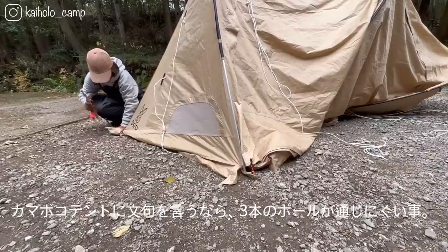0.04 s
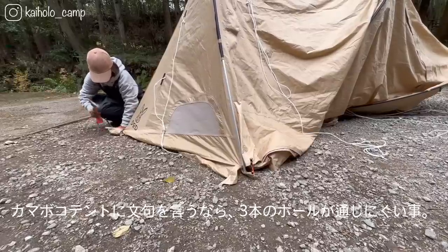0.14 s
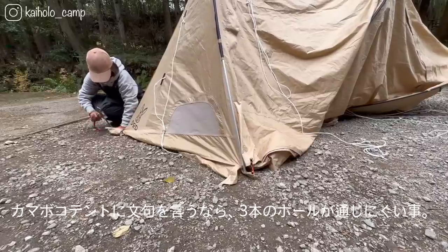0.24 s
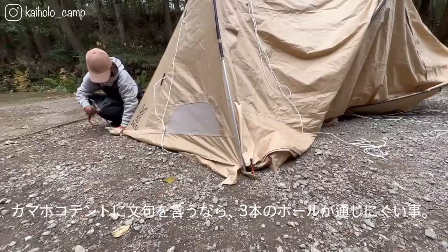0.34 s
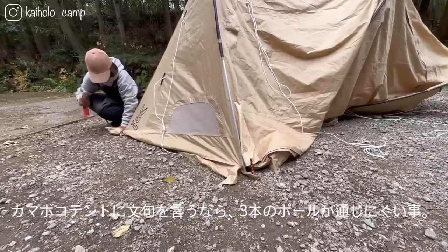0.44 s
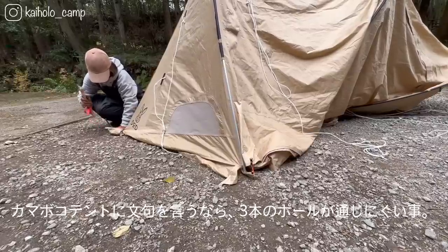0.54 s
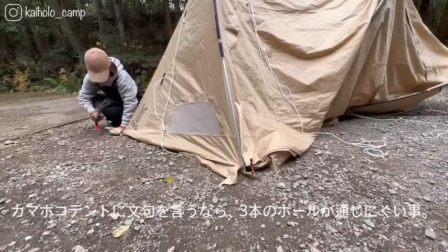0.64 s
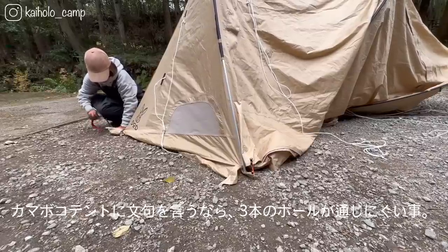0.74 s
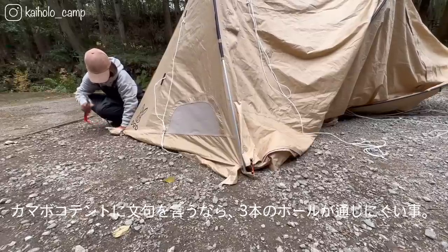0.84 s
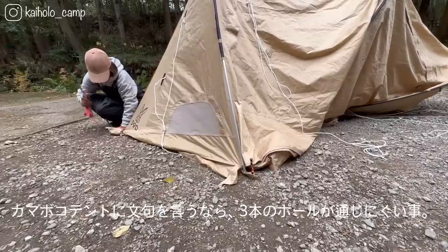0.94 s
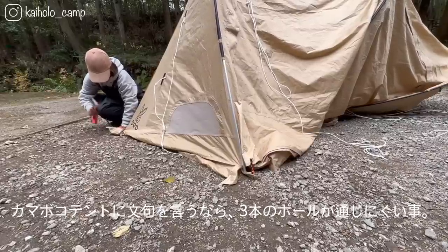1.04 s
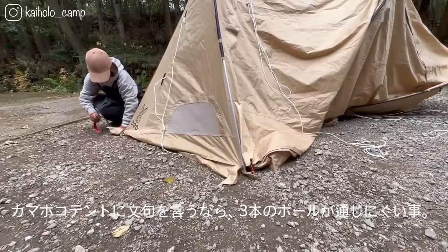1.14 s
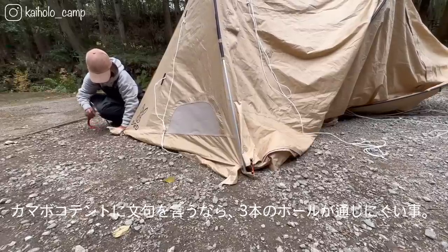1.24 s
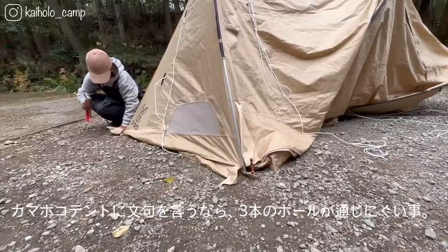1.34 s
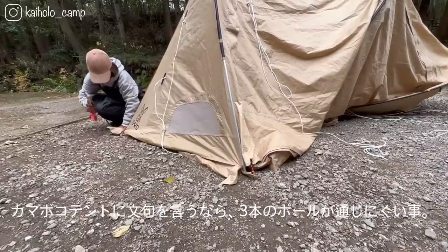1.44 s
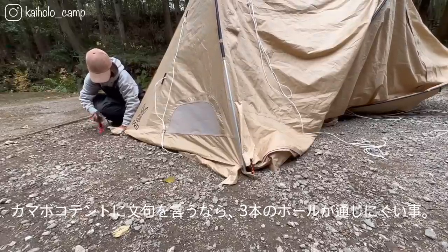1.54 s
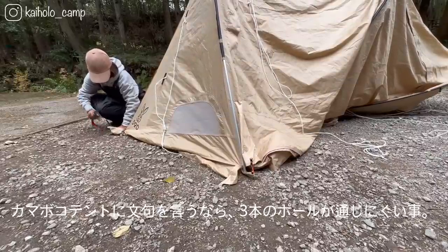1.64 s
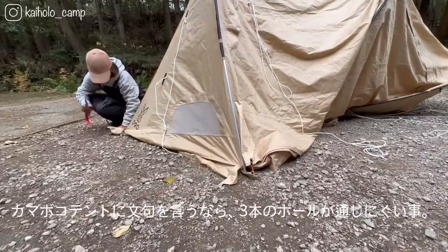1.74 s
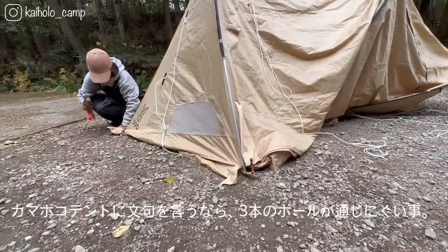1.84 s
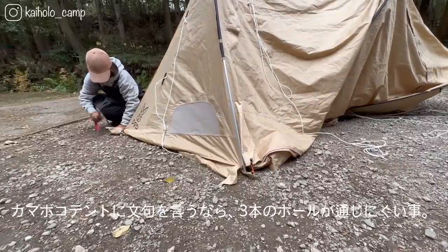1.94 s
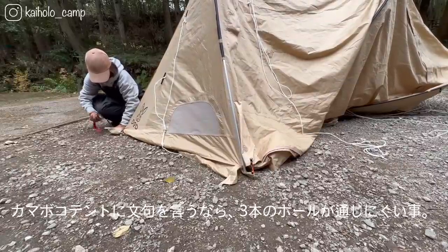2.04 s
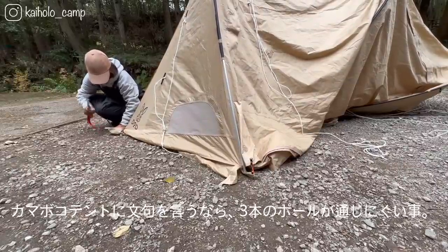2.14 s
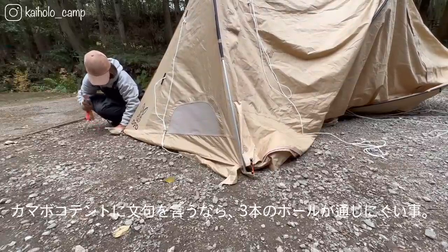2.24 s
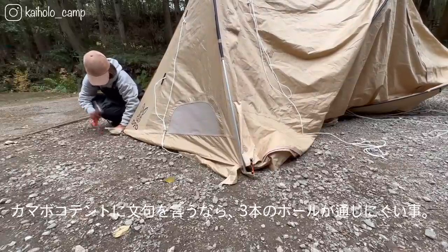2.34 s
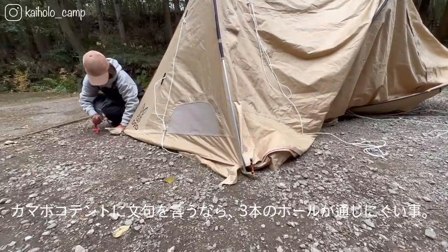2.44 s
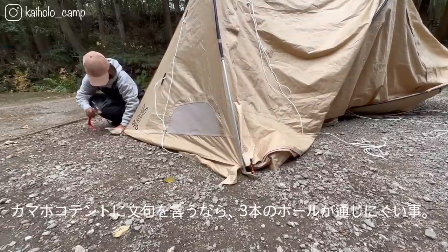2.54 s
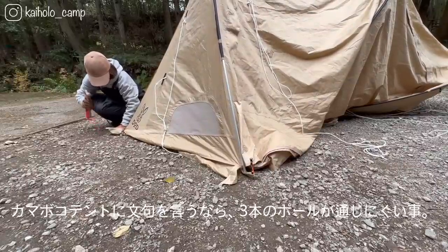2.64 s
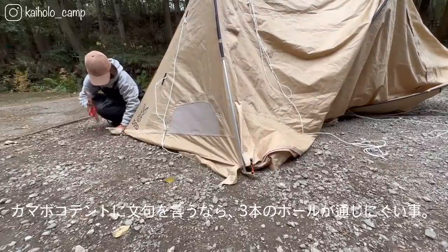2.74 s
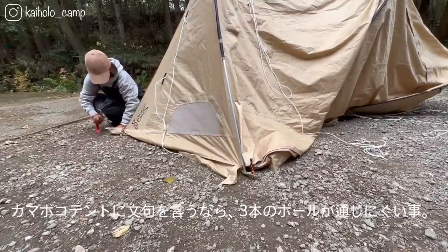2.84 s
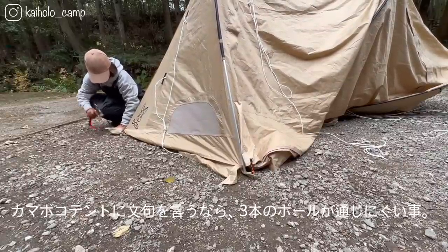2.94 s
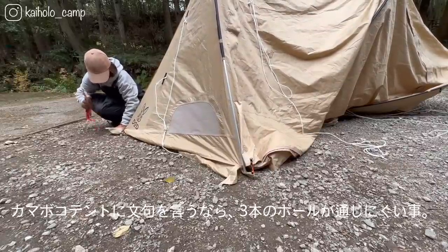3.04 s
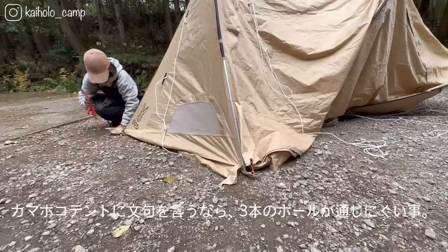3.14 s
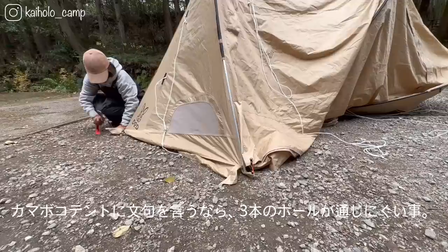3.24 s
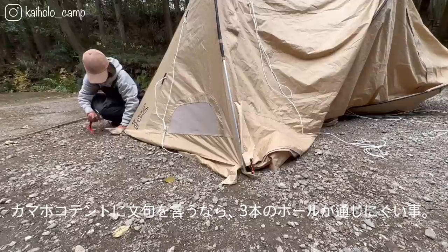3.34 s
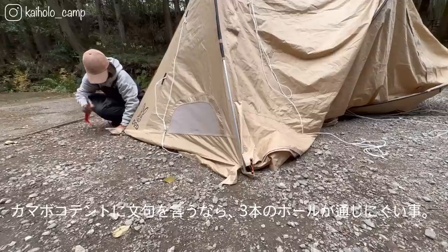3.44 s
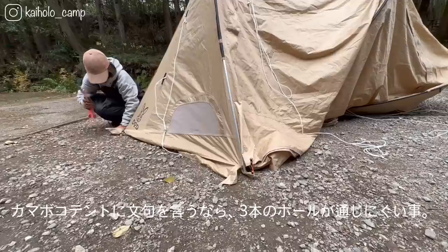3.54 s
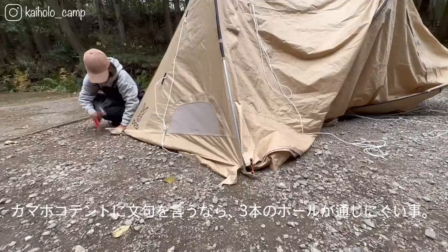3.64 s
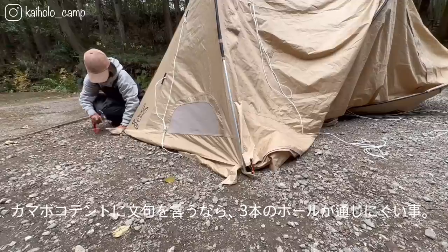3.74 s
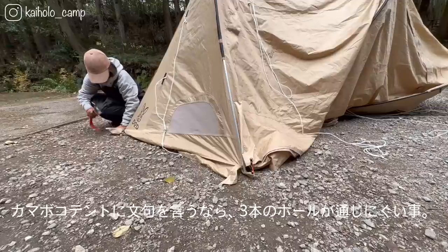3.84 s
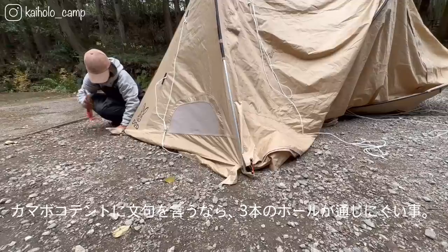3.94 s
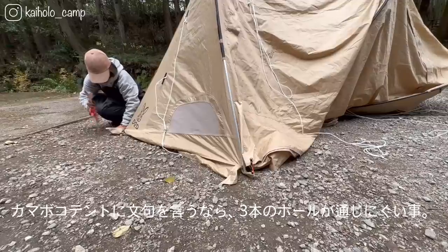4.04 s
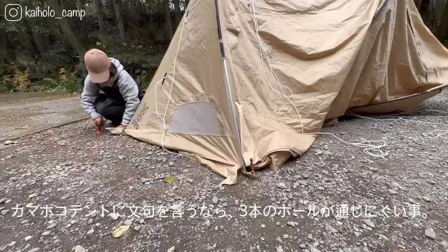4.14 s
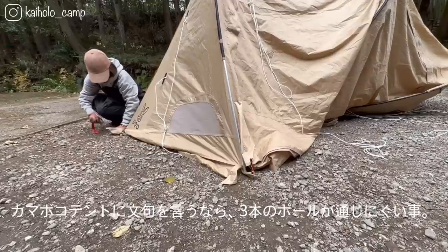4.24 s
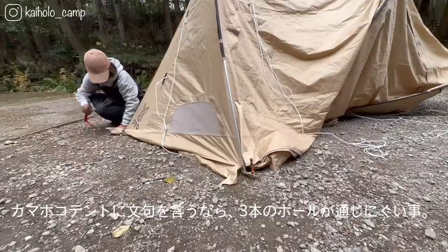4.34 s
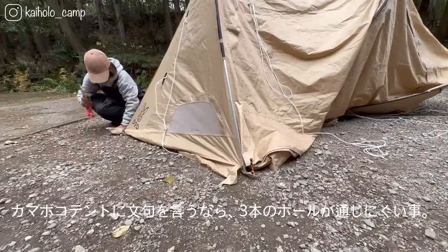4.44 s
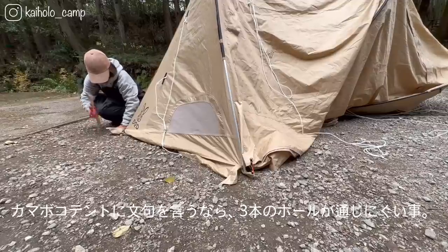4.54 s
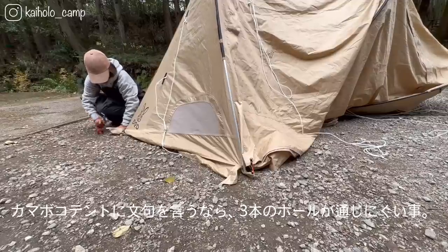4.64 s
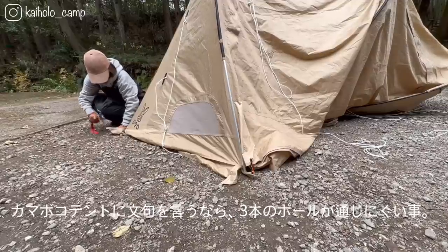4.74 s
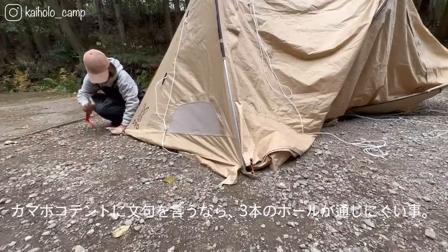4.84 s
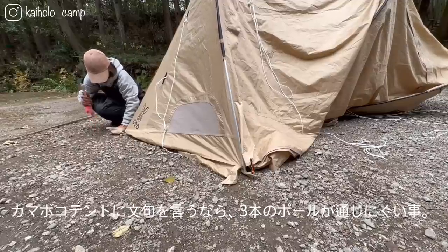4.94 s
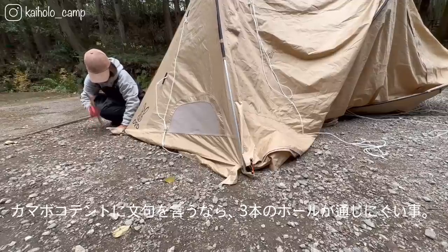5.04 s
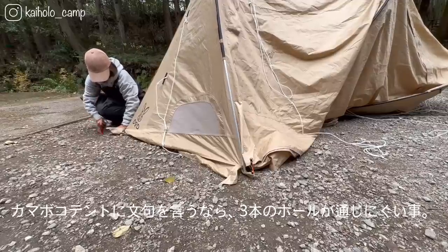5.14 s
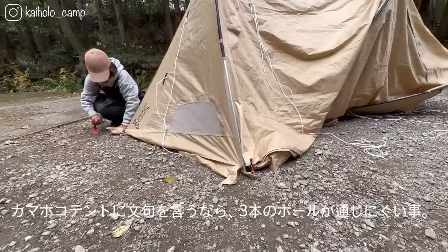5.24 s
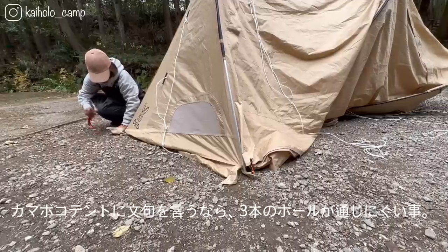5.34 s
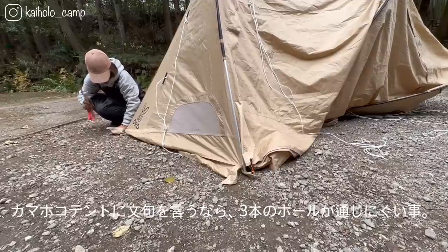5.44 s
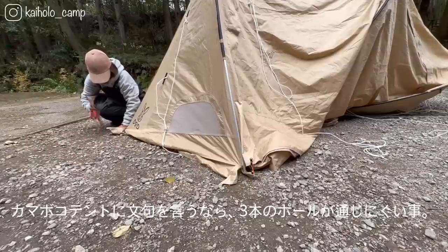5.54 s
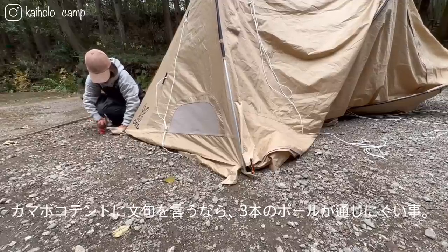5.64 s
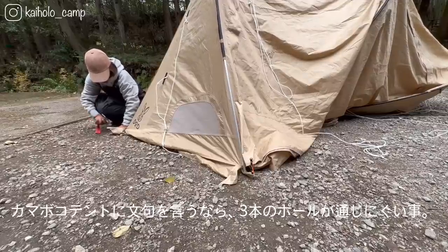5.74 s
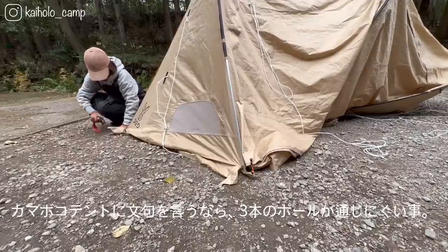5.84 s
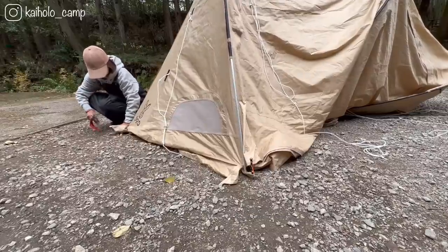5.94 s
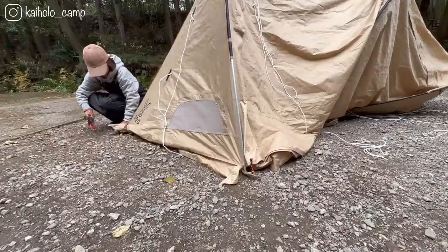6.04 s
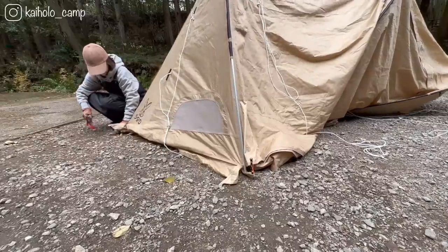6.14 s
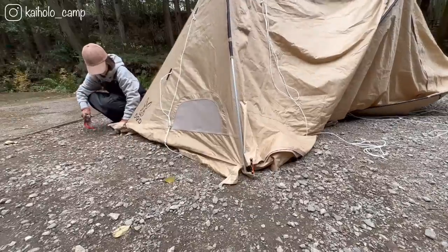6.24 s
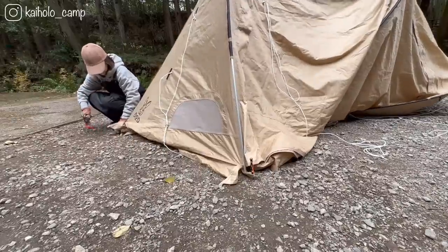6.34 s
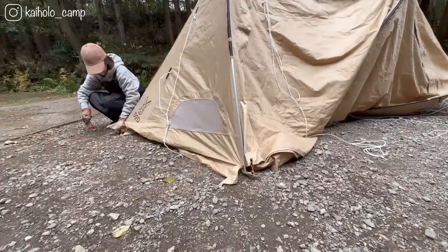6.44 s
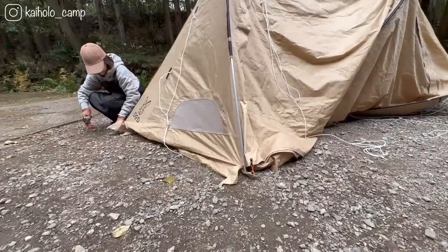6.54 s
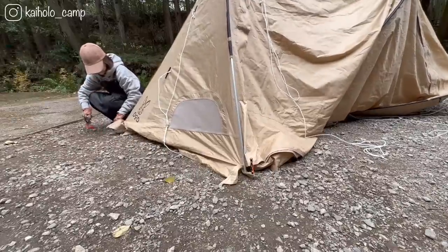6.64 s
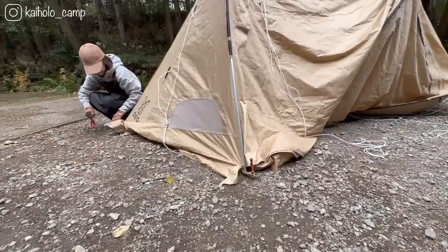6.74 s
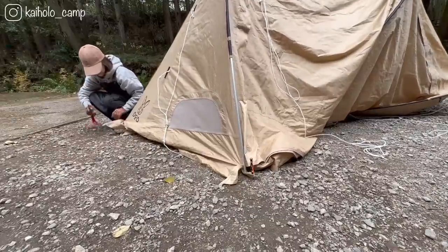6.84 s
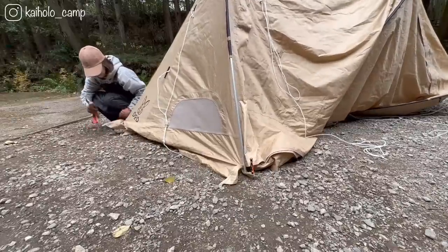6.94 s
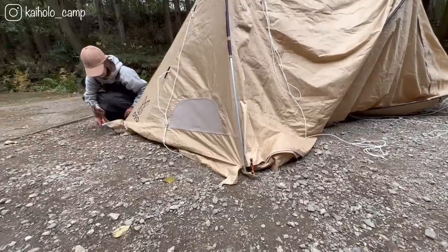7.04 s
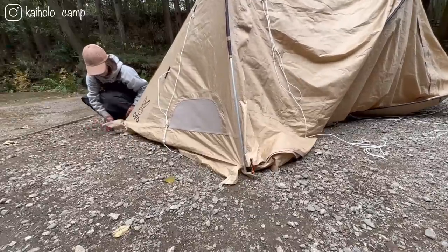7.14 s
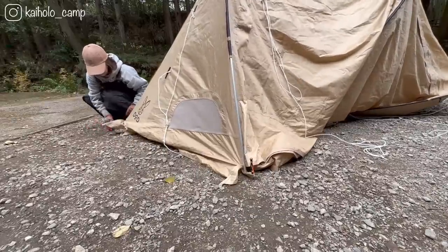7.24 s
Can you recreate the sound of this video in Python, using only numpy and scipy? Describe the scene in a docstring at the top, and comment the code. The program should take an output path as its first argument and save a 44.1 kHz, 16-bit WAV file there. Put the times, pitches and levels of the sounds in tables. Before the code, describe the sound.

Sharp hammer blows on a tent peg, a few metres left of a stereo microphone outdoors. Each is a bright crack with a short steel ring, a low thump and a brief diffuse echo from tent and trees. Light scrapes and bounce ticks fill the gaps as the ground firms. The steady series stops, tent fabric rustles, dull ground knocks follow, and one last lighter strike lands over low rumble and soft hiss.

```python
"""A steel hammer drives a tent peg into gravel at a forest campsite, a few metres to the left of two microphones.
Low outdoor rumble and soft hiss, made of shaped noise, run throughout. Each blow is a noise crack, damped modes of
steel and a falling thump, answered by diffuse echoes of tent and trees; light scrapes come between blows.
As the soil firms, the thump gives way to a hard clack; from the fifth blow the hammer often drops back on the peg.
Late on, cloth rustles and dull knocks surround a last blow. The loudest peaks overload the recorder."""
import sys
import numpy as np
from scipy import signal
from scipy.fft import rfft, irfft
from scipy.io import wavfile
from scipy.ndimage import uniform_filter1d

SR = 44100
rng = np.random.default_rng(int(sys.argv[2]) if len(sys.argv) > 2 else 0)


def int16_out(signal):
    """Quantize to a 16-bit WAV file."""
    q = np.round(np.clip(np.atleast_2d(signal).T, -1, 1) * 32767)
    wavfile.write(sys.argv[1], SR, q.astype(np.int16))


N = 320607  # length in samples
T = np.arange(SR // 2) / SR  # time after a hit, in seconds


def amp(db):
    """Level law: converts decibels to an amplitude gain."""
    return 10 ** (np.asarray(db) / 20)


def evened(x):
    """Normalisation: scales a signal to rms 1."""
    return x / np.sqrt(np.mean(x ** 2) + 1e-20)


def read(points, hz):
    """Logarithmic pitch scale: reads a table by interpolating along log frequency."""
    f, value = np.transpose(points)
    return np.interp(np.log(hz + 1), np.log(f), value)


def add(mix, s, sound):
    """Superposition: adds a sound into the mix at time s."""
    part = mix[round(s * SR):][:len(sound)]
    part += sound[:len(part)]


def colour(points, size=2048):
    """Minimum phase: the log spectrum alone fixes a causal impulse response."""
    log_gain = np.log(amp(read(points, abs(np.fft.fftfreq(size, 1 / SR)))))
    return np.fft.ifft(np.exp(np.conj(signal.hilbert(log_gain)))).real[:size // 2]


# How firmly the soil resists the sinking peg.
# Each row: time in seconds, firmness from 0 (loose) to 1 (firm).
SOIL_FIRMNESS = [(0.17, 0.01), (1.94, 0.29), (2.81, .9), (5.6, 1)]


def by_soil(s, loose, firm):
    """Soil resistance: blends a value for loose soil into one for firm soil as the peg sinks."""
    return loose + (firm - loose) * np.interp(s, *np.transpose(SOIL_FIRMNESS))


# Relative spectrum of the outdoor air. Each row: frequency in Hz, density in dB per Hz.
AIR_SPECTRUM = [(15, -49), (25, -19.5), (47, -15), (70, -1), (149, -16.5), (185, -17.5), (270, -17),
                (363, -12), (516, -18.5), (2000, -23.5), (2910, -25.5), (4370, -28), (7510, -39.5),
                (14000, -48.5), (16000, -63.5)]
# Likeness of the two channels. Each row: frequency in Hz, left-right coherence (signed, -1 to 1).
AIR_COHERENCE = [(60, 0.94), (130, 0.9), (290, 0.48), (640, -0.38), (1410, -0.27), (3100, 0), (6820, 0.11),
                 (15000, 1)]
# Balance of the two channels. Each row: frequency in Hz, left minus right in dB.
AIR_BALANCE_DB = [(60, 0.5), (700, 2.5), (2400, 2), (4400, 4.5), (8100, -1), (15000, 0)]
# Troughs of the low rumble. Each row: time in seconds, level in dB.
RUMBLE_TROUGHS = [(0.0, -52), (1.96, -46.5), (2.61, -49), (3.87, -44), (5.95, -48), (6.88, -52.5),
                  (7.27, -50)]
RUMBLE_OVER_DB, HISS_DB = 2, -47  # mean rumble above its troughs; steady forest hiss


def air():
    """Partially coherent noise: low outdoor rumble and soft forest hiss, drifting in patches."""
    frames, hz = N // 512 + 5, np.fft.rfftfreq(2048, 1 / SR)
    a, b, c, d, patches = rng.standard_normal((5, len(hz), frames))
    patches = uniform_filter1d(patches, size=10, axis=0)
    patches = evened(uniform_filter1d(patches, size=8, axis=1))
    left = a + 1j * b
    independent = c + 1j * d
    coherence = np.clip(read(AIR_COHERENCE, hz), -1, 1)[:, None]
    right = coherence * left + np.sqrt(1 - coherence ** 2) * independent
    right = right / amp(read(AIR_BALANCE_DB, hz))[:, None]
    level_db = read(AIR_SPECTRUM, hz)[:, None] + 1.5 * patches
    spectrum = np.array([left, right]) * amp(level_db)
    low = 1 / (1 + (hz[:, None] / 160) ** 4)  # rumble lies mostly below 160 Hz, hiss above
    rumble_db = np.interp(np.arange(N) / SR, *np.transpose(RUMBLE_TROUGHS)) + RUMBLE_OVER_DB
    out = np.zeros((2, N))
    for share, db in zip((low, 1 - low), (rumble_db, HISS_DB)):
        noise = signal.istft(spectrum * share, nperseg=2048, noverlap=1536)[1][:, :N]
        out += evened(noise) * amp(db)
    return out


# Relative spectrum of steel cracking on steel and grit. Each row: frequency in Hz, density in dB per Hz.
CRACK_SPECTRUM = [(100, -23.5), (400, -2), (1100, -4.5), (1900, 3), (2450, -8), (3000, -3.5), (3900, -0.5),
                  (4800, -2), (6000, -3.5), (7500, -1), (9000, -9), (11500, -10), (13000, -15.5),
                  (15200, -18), (16500, -10.5)]


def burst(length, steepness, tilt_db=0):
    """Impact excitation: a few milliseconds of steel chattering, uneven in time and broad in pitch."""
    envelope = np.exp(-(T[:4096] / length) ** steepness)  # length in seconds
    spectrum = rfft(rng.standard_normal(len(envelope)) * envelope)
    # partly flatten the random spectrum so the crack sounds broad and even in pitch
    flattened = spectrum / (abs(spectrum) + 1e-9) ** .6
    chatter = irfft(flattened) * envelope ** .3
    chatter *= np.linalg.norm(envelope) / np.linalg.norm(chatter)
    tilted = [(hz, db + tilt_db * np.log2(hz / 4000)) for hz, db in CRACK_SPECTRUM]  # dB per octave
    shape = colour(tilted)
    crack = signal.fftconvolve(chatter, shape / np.linalg.norm(shape))
    return np.pad(crack, (0, len(T) - len(crack)))


def ring(modes, detune, spread_db, rise):
    """Modal superposition: damped sines, whose level, pitch and phase vary a little with each hit."""
    out = np.zeros(len(T))
    for (hz, db, t60), (a, b, c) in zip(modes, rng.standard_normal((len(modes), 3))):
        decay = np.exp(-np.log(1000) * T / t60)
        wave = np.sin(2 * np.pi * (hz * (1 + detune * b) * T + c))
        out += amp(db + spread_db * a) * decay * wave
    return out * (1 - np.exp(-T / rise))


def thump(crest, start_hz, end_hz, glide):
    """Dispersion: low notes of the ground's push arrive later than high ones, so the pitch drops."""
    turns = end_hz * T + (start_hz - end_hz) * glide * (1 - np.exp(-T / glide))
    u = T / crest  # the envelope peaks at the crest time, in seconds
    return u * np.exp((1 - u ** 3) / 3) * np.sin(2 * np.pi * turns)


# Hammer blows; where the face lands decides which notes of the peg ring.
# Each row: start in seconds, force in dB, low ring in dB, middle ring in dB, high ring in dB,
# pitch of the gripped shaft in Hz.
HAMMER_BLOWS = [(0.1705, -3.5, 6.5, -36.5, -42, 3180), (0.6329, -0.5, -4, -15, -30, 3840),
                (1.071, -0.5, -18.5, -34.5, -46.5, 3260), (1.5097, 0.5, 1, -22.5, -47, 3300),
                (1.9391, -0.5, 0.5, -39, -30.5, 3960), (2.3610, -1.4, -13, -31.5, -56.5, 3730),
                (2.809, 0.5, -33, -17, -46, 3450), (3.223, 1.5, -11, -23, -39, 3053),
                (3.658, 0, -9, -27, -46, 3180), (4.1022, -.5, -9, -16.5, -32.5, 3670),
                (4.5876, 0.5, -16, -22, -50.5, 3160), (5.0904, -0.8, -28, -25, -43, 3210),
                (5.5962, -0.1, -24.5, -33, -47, 3040), (7.1109, -4, -22.5, -22, -41, 2690)]
# Free ringing of the peg: the low note and its lingering twin, a middle pair, then the high ones.
# Each row: frequency in Hz, relative level in dB, 60 dB decay time in seconds.
PEG_MODES = [(4086, -1, .115), (4076, -0.5, 0.42), (7562, 0, .15), (7750, -7, 0.11), (9885, -2, .24),
             (9815, -6, 0.24), (9955, -6, .2), (11940, -12.5, 0.12), (12260, -10, .12)]
# Quickly damped modes of the hammer head and the gripped peg.
# Each row: frequency in Hz, relative level in dB, 60 dB decay time in seconds.
CLACK_MODES = [(1860, -10.5, .018), (2958, -0.5, 0.025), (3293, 0.5, 0.016), (3513, -10, 0.018),
               (4400, -11.5, .015), (4835, 3, 0.018), (6950, -11, .018), (7390, -17.5, 0.024),
               (7670, -9.5, 0.025), (9500, -10.5, 0.015), (11060, -2, 0.017), (11580, -3, 0.018)]
CRACK_DB, CRACK_S, CRACK_TILT_DB = -0.5, 0.0051, 0.5  # level at 0 dB force, length, tilt per octave
CLACK_LOOSE_DB, CLACK_FIRM_DB, CLACK_PER_FORCE = -15, -0.5, 2.4  # last: dB per dB of force
THUMP_LOOSE_DB, THUMP_FIRM_DB = -6, -13.5  # firm soil gives less
CREST_LOOSE_S, CREST_FIRM_S = .0078, 0.0031  # time to the thump's crest
# the low note's lingering twin follows its level (last: dB per dB)
LINGER_LOOSE_DB, LINGER_FIRM_DB, LINGER_PER_RING = -30.5, -26.5, .45
RATTLE_DB = 3  # stones shaking against the peg make its ring uneven


def hammering():
    """Impact response: each blow gives a broad crack with the soil's thump and shudder, a clack, and a ring."""
    broad, clack, peg = np.zeros((3, N))
    soil_band = signal.butter(2, [110, 210], "bandpass", fs=SR, output="sos")
    for s, force_db, low_db, middle_db, high_db, shaft_hz in HAMMER_BLOWS:
        crack = burst(CRACK_S, steepness=2.9, tilt_db=CRACK_TILT_DB)
        add(broad, s, amp(CRACK_DB + force_db) * crack)

        thump_db = force_db + by_soil(s, THUMP_LOOSE_DB, THUMP_FIRM_DB)
        crest = by_soil(s, CREST_LOOSE_S, CREST_FIRM_S)
        add(broad, s, amp(thump_db) * thump(crest, start_hz=988, end_hz=176.7, glide=.0028))
        soil_noise = evened(signal.sosfilt(soil_band, rng.standard_normal(len(T))))
        shudder = soil_noise * np.exp(-T / 0.0338)
        add(broad, s, amp(-21.5 + 0.22 * thump_db) * shudder)

        shaft = [(shaft_hz, -1, .028)]  # this mode shifts with the grip of the stones around the peg
        clack_db = CLACK_PER_FORCE * force_db + by_soil(s, CLACK_LOOSE_DB, CLACK_FIRM_DB)
        modes = list(CLACK_MODES) + shaft
        add(clack, s, amp(clack_db) * ring(modes, detune=0.0053, spread_db=0.3, rise=0.0012))

        linger_db = by_soil(s, LINGER_LOOSE_DB, LINGER_FIRM_DB) + LINGER_PER_RING * low_db
        rings_db = low_db, linger_db, middle_db, high_db
        groups = PEG_MODES[:1], PEG_MODES[1:2], PEG_MODES[2:4], PEG_MODES[4:]
        for db, modes in zip(rings_db, groups):
            slow = uniform_filter1d(rng.standard_normal(len(T)), size=300)
            rattle = evened(uniform_filter1d(slow, size=150))
            tone = ring(modes, detune=0.0012, spread_db=1.5, rise=0.0013)
            add(peg, s, amp(db + RATTLE_DB * rattle) * tone)
    return broad, clack, peg


# Relative spectrum of the reflections at their start. Each row: frequency in Hz, level in dB.
ECHO_SPECTRUM = [(60, -20), (130, -4.5), (400, 2), (1200, 8.5), (1900, -3.5), (2450, 6.5), (3200, -0.5),
                 (5200, -2), (7500, -1.5), (10000, 2.5), (12500, 0.5), (15000, 13), (16000, -14)]
# Decay of the reflections before stretching. Each row: frequency in Hz, 60 dB decay time in seconds.
ECHO_DECAY = [(120, 0.091), (320, 0.27), (840, 0.24), (2200, 0.34), (5800, 0.37), (10000, 0.22),
              (15000, 0.1)]


def echoes(x, start, rise, stretch):
    """Diffuse reflection: the echoes swell after a delay and each band dies at its own speed."""
    hz, t, z = signal.stft(rng.standard_normal((2, SR // 2)), SR, nperseg=256)
    t60 = stretch * read(ECHO_DECAY, hz)[:, None]
    z = z * amp(read(ECHO_SPECTRUM, hz))[:, None] * np.exp(-np.log(1000) * t / t60)
    swell = np.clip((T - start) / rise, 0, 1)  # start and rise in seconds
    tail = signal.istft(z, SR, nperseg=256)[1][:, :len(T)] * swell
    return signal.fftconvolve(x[None], tail / np.linalg.norm(tail[0]), axes=1)[:, :N]


def campsite(x):
    """Diffuse reverberation: tent and gravel answer briefly, while the trees swell slower and last longer."""
    out = np.zeros((2, N))
    blow = np.searchsorted([row[0] - .01 for row in HAMMER_BLOWS], np.arange(N) / SR)
    for k in range(7):  # seven random echo patterns are used in turn from blow to blow
        part = x * (blow % 7 == k)
        out += amp(-13.5) * echoes(part, start=0.0043, rise=0.0037, stretch=0.27)
        out += amp(-21.5) * echoes(part, start=0.0041, rise=0.012, stretch=1.396)
    return out


# Light touches of the hammer and peg between blows. Each row: start in seconds, level in dB.
LIGHT_SCRAPES = [(0.464, -40), (1.804, -45.5), (3.089, -43), (3.497, -41.5), (3.525, -41.5), (3.926, -44),
                 (4.403, -44.5), (4.449, -38.5), (4.922, -40), (5.419, -43), (5.452, -38.5), (6.972, -41.5)]
# What a light touch rings.
# Each row: frequency in Hz, relative level in dB, 60 dB decay time in seconds.
TOUCH_MODES = [(3500, -2, .025), (4620, -3, .025), (10520, -17.5, 0.047)]


def scraping():
    """Weak contact excitation: thin grit noise and a short tink of steel modes."""
    out = np.zeros(N)
    thin = signal.butter(2, [2800, 11000], "bandpass", fs=SR, output="sos")
    for s, db in LIGHT_SCRAPES:
        grit = burst(length=0.0012, steepness=0.92) + amp(-10.5) * burst(length=0.015, steepness=1.7)
        tink = ring(TOUCH_MODES, detune=.01, spread_db=1, rise=.0004)
        add(out, s, amp(db) * (amp(2) * signal.sosfilt(thin, grit) + amp(4) * tink))
    return out


# The hammer drops back on the peg. Each row: start in seconds, tick level in dB.
HAMMER_BOUNCES = [(1.978, -19.5), (2.4052, -10.5), (2.861, -15.5), (3.262, -12.5), (3.689, -16.5),
                  (4.624, -18), (5.131, -14.5), (5.625, -15.5)]
REBOUND_LOOSE_DB, REBOUND_FIRM_DB = -38.5, -20  # thump of this second landing


def bouncing():
    """Rebound: the second landing is a weak impact, a tick of steel over a small thump."""
    out = np.zeros(N)
    for s, tick_db in HAMMER_BOUNCES:
        thump_db = by_soil(s, REBOUND_LOOSE_DB, REBOUND_FIRM_DB)
        clack = ring(CLACK_MODES[1:6], detune=.02, spread_db=1, rise=.0005)
        clack = clack * np.exp(-T / .005)  # extra damping
        tick = amp(-7.5) * burst(length=0.0045, steepness=0.99, tilt_db=-3) + amp(-5.5) * clack
        landing = thump(0.0056, start_hz=684, end_hz=150, glide=0.0039)
        add(out, s, amp(tick_db) * tick + amp(thump_db) * landing)
    return out


# Sleeves and tent cloth rustle.
# Each row: start in seconds, length in seconds, level before the swell in dB, tilt in dB per octave.
CLOTH_RUSTLES = [(5.702, 0.39, -45.5, -1), (6.05, .42, -52.5, -5.5), (6.72, 0.66, -47.5, 1)]
# Relative spectrum of cloth before the tilt. Each row: frequency in Hz, density in dB per Hz.
CLOTH_SPECTRUM = [(100, -19.5), (400, -2), (1200, 0), (3000, -8), (6000, -10), (14000, -25.5)]


def rustling():
    """Friction noise: cloth slides in soft swells, made grainy by its folds."""
    out = np.zeros(N)
    for s, length, db, tilt_db in CLOTH_RUSTLES:
        u = np.arange(0, 1, 1 / (length * SR))
        folds = evened(uniform_filter1d(rng.standard_normal(len(u)), size=700))
        shape = colour([(hz, level + tilt_db * np.log2(hz)) for hz, level in CLOTH_SPECTRUM])
        grains = rng.standard_normal(len(u)) * amp(2.51 * folds)
        slide = signal.fftconvolve(grains, shape)[:len(u)]
        add(out, s, amp(db) * evened(slide) * np.sin(np.pi * u))
    return out


# Dull knocks, mostly on the ground; the last is the hammer dropping back after the final blow. Each row: start
# in seconds, level in dB.
GROUND_KNOCKS = [(5.942, -35), (6.078, -38.5), (6.392, -36), (7.0202, -13.5), (7.028, -24), (7.043, -28),
                 (7.162, -21.5)]


def knocking():
    """Soft impact: a yielding contact gives a short thump and a click with little treble."""
    out = np.zeros(N)
    dull = signal.butter(5, 1700, "lowpass", fs=SR, output="sos")
    for s, db in GROUND_KNOCKS:
        click = signal.sosfilt(dull, burst(length=.003, steepness=1.6))
        push = thump(.0024, start_hz=1203, end_hz=286, glide=0.0019)
        add(out, s, amp(db) * (amp(1.5) * push + amp(0.5) * click))
    return out


# Delay of direct sound at the right microphone. Each row: frequency in Hz, phase lag in radians.
RIGHT_LAG = [(30, 0), (300, .6), (1000, 2), (2000, 3.2), (3100, 4.5), (4000, 6.2), (5500, 7.7),
             (7000, 10.6), (7700, 12.8), (8700, 15.6), (9800, 13.5), (11200, 12.6), (15000, 10.9)]
# Shading of the right microphone against the left. Each row: frequency in Hz, gain in dB.
RIGHT_SHADE = [(100, 3), (400, -5.5), (1200, -1), (2300, -5), (3000, -3), (4400, -8.5), (6000, -9),
               (7500, -10), (8500, 0), (9900, 5), (11000, -1), (15000, 6)]


def microphones(direct, reflected):
    """Diffraction: sound from the left reaches the right port later, shaded by the recorder's body."""
    hz = np.fft.rfftfreq(N, 1 / SR)
    delayed = irfft(rfft(direct) * np.exp(-1j * read(RIGHT_LAG, hz)), N)
    right = delayed + reflected[1]
    shaded = irfft(rfft(right) * amp(read(RIGHT_SHADE, hz)), N)
    return np.array([direct + reflected[0], shaded])


def scene():
    """Superposition: hammer and echoes over the outdoor air; the broad crack scatters most widely."""
    background = air()
    broad, clack, peg = hammering()
    broad = broad + scraping() + bouncing() + rustling() + knocking()
    reflected = campsite(broad + amp(-11.5) * clack + amp(-5.5) * peg)
    return microphones(broad + clack + peg, reflected) + background


# Narrow dips of the microphone ports. Each row: frequency in Hz, width in Hz, depth from 0 to 1.
PORT_DIPS = [(5196, 87, 0.7), (7400, 200, 1), (9400, 140, 0.8)]
EDGE_HZ = 16100  # upper band limit


def record(dry):
    """Resonance and saturation: ports cut narrow dips, peaks overload with a firm knee, then the band limit."""
    for hz, width, depth in PORT_DIPS:
        resonance = signal.lfilter(*signal.iirpeak(hz, hz / width, fs=SR), dry)
        dry = dry - np.clip(depth, 0, 1) * resonance
    clipped = dry / (1 + dry ** 10) ** (1 / 10)
    band = signal.firwin(255, EDGE_HZ, window=("kaiser", 8), fs=SR)
    return signal.oaconvolve(clipped, band[None], "same")


dry = scene()
out = record(dry)
int16_out(out)
```